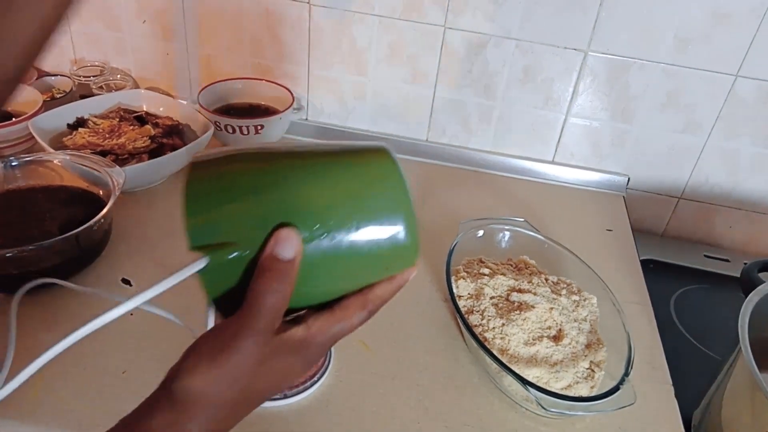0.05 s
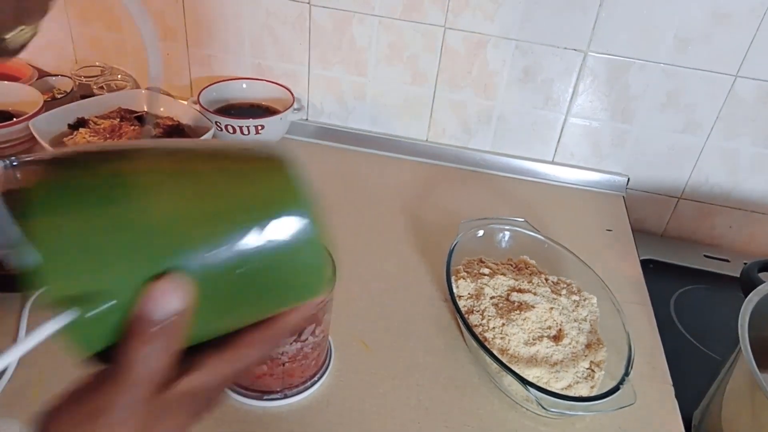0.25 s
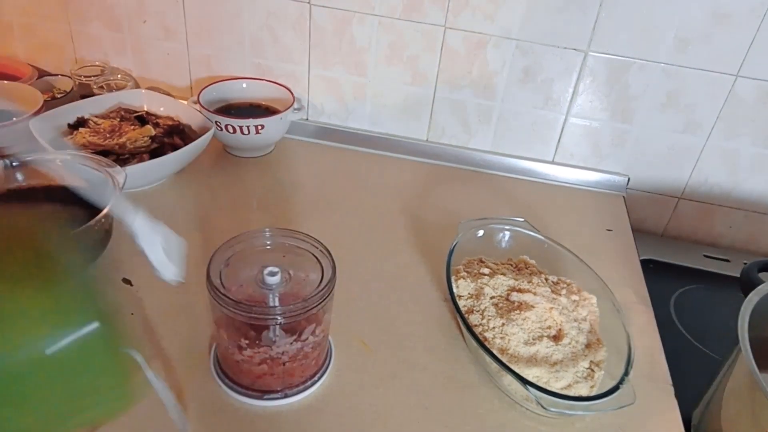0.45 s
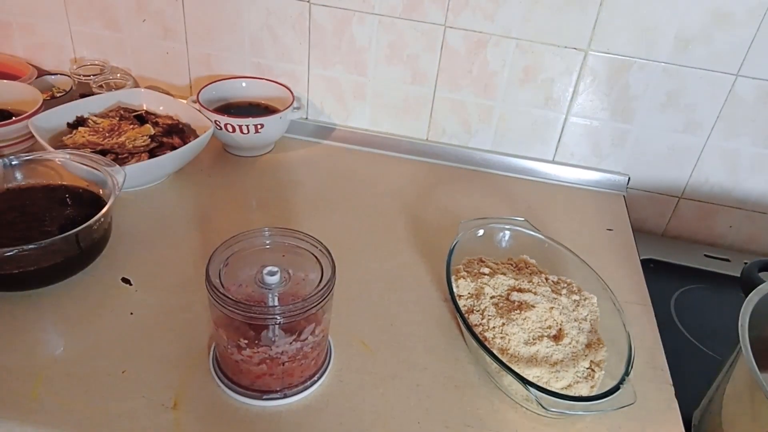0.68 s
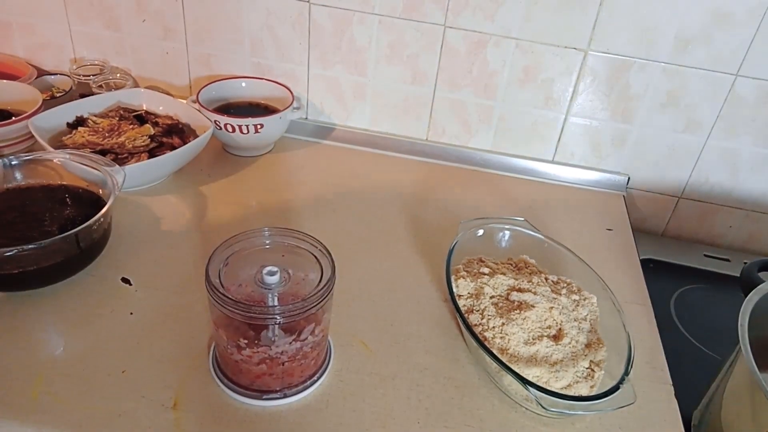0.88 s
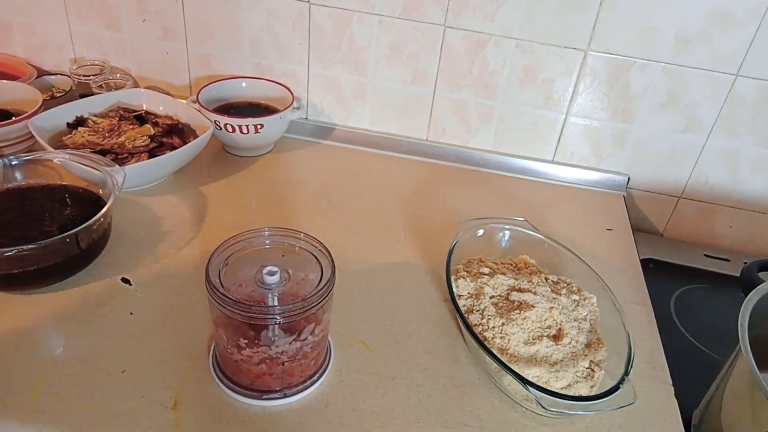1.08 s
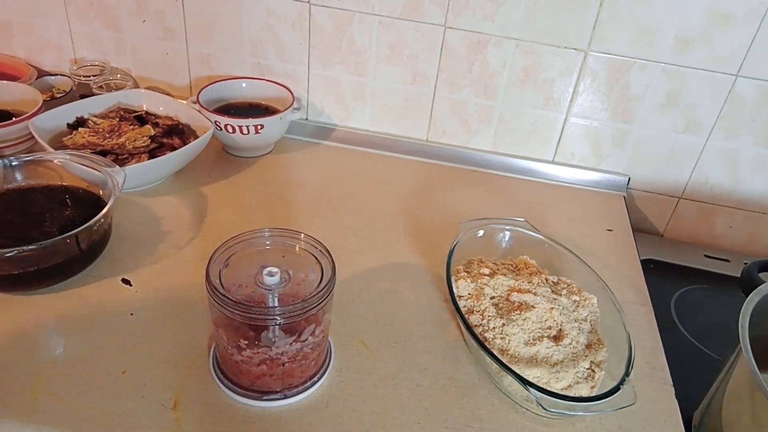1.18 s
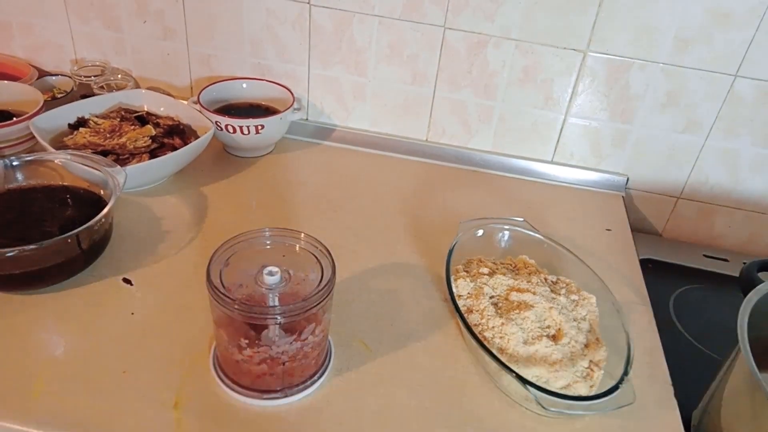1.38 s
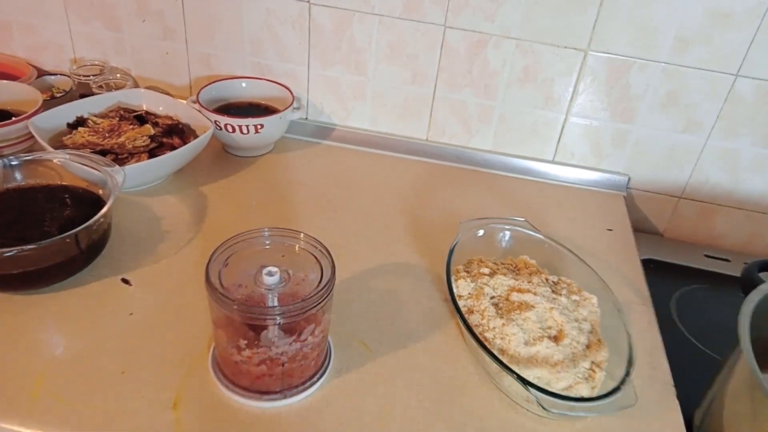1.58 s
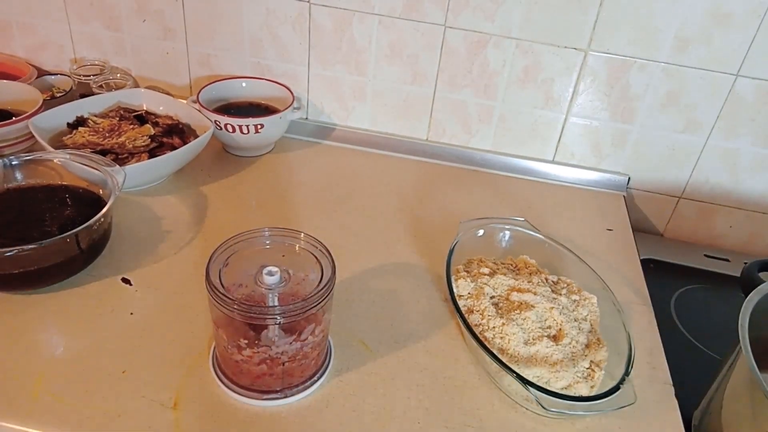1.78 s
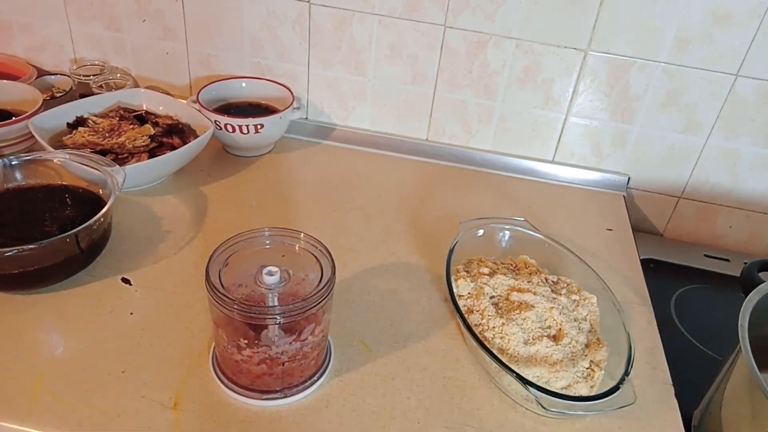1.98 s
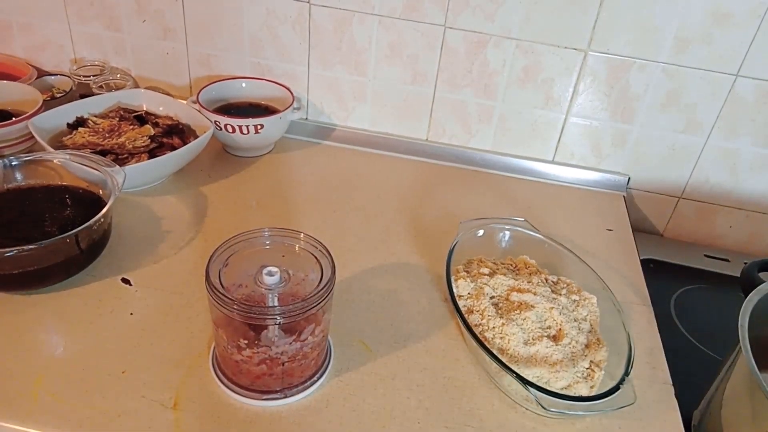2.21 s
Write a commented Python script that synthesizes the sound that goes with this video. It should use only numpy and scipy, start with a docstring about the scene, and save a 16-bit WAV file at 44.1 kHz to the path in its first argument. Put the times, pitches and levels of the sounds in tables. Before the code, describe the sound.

Plastic chopper pieces knock, click and scrape on a counter over a faint low appliance hum

```python
"""Parts of a small plastic food chopper are put down and shifted on a kitchen counter, away from the microphone.
An appliance hum (wavering tones in shaped noise) runs throughout, and a faint scrape (gritty noise) opens it.
Hollow knocks (short-lived tones of a housing) and hard clicks (noise bursts with a ringing lid) follow, mixed
with soft thumps (low fading tones), faint clinks of a cup and a glass dish (damped tones) and more scrapes.
All the handling rings in a tiled room, made of fading noise."""
import sys
import numpy as np
from scipy import signal
from scipy.fft import rfft, irfft, next_fast_len
from scipy.io import wavfile
from scipy.ndimage import uniform_filter1d, map_coordinates

SR = 44100
rng = np.random.default_rng(int(sys.argv[2]) if len(sys.argv) > 2 else 0)


def linear_from_db(decibels):
    """Turn decibels (scalar or array-like) into linear amplitude factors; 0 gives 1."""
    return 10 ** (np.asarray(decibels, float) / 20)


def master_out(mix):
    """Clip the mix to full scale and print it as 16-bit PCM to the path in sys.argv[1]."""
    frames = np.transpose(np.atleast_2d(mix))
    ceiling = np.clip(frames, -1, 1)
    pcm = np.round(ceiling * 32767).astype(np.int16)
    wavfile.write(sys.argv[1], SR, pcm)


N = 99225  # samples in the scene
EVENT_T = np.arange(SR // 3) / SR  # clock of one handling sound, s
WET_DB, KNOCK_WET_DB, NEAR_WET_DB = -6.5, -7.5, -8  # room level; least on clinks and thumps


def unit(x):
    """Scale to rms 1."""
    return x / np.sqrt(np.mean(x ** 2) + 1e-20)


def along(points, hz):
    """Read a curve of (Hz, value) points on a log frequency axis."""
    f, v = np.transpose(points)
    return np.interp(np.log(hz + 1), np.log(f + 1), v)


def coloured(x, gain):
    """Multiply the spectrum of x by a gain that depends on frequency."""
    m = next_fast_len(len(x) + 4096)
    return irfft(rfft(x, m) * gain(np.fft.rfftfreq(m, 1 / SR)), m)[:len(x)]


def add(out, s, x, wet_db=WET_DB):
    """Place a sound at s seconds with its room tail: noise that fades at its own rate in each band."""
    # How long the tiled room rings. Each row: frequency in Hz, time to fall 60 dB in seconds.
    room_times = [(200, 0.42), (600, 0.26), (2000, 0.46), (6000, 0.44), (9000, 0.29), (15000, 0.26)]
    predelay_s = 0.003
    hz, t, z = signal.stft(rng.standard_normal(SR // 2), SR, nperseg=256)
    fade = linear_from_db(-60 * t / along(room_times, hz)[:, None])
    tail = signal.istft(z * fade, SR, nperseg=256)[1]
    tail = np.pad(tail / np.linalg.norm(tail), (round(predelay_s * SR), 0))
    wet = linear_from_db(wet_db) * signal.fftconvolve(x, tail)
    wet[:len(x)] += x  # the direct sound
    i = round(s * SR)
    out[i:i + len(wet)] += wet


def plastic(x, tilt_db, low_hz):
    """Give x the colour of hard plastic, tilted about 4 kHz and cut below low_hz, at rms 1."""
    # The colour of hard plastic. Each row: frequency in Hz, relative level in dB per Hz.
    colour = [(300, 16.5), (1000, 3), (1700, 2.2), (2400, -1), (3800, 0.9), (7000, 0.25), (16500, -15.5)]

    def gain(hz):
        tilted_db = along(colour, hz) + tilt_db * np.log2((hz + 1) / 4000)
        return linear_from_db(tilted_db) / (1 + (low_hz / (hz + 1)) ** 6)

    return unit(coloured(x, gain))


def octaves(modes, hz):
    """Distance of each mode from a pitch, in octaves."""
    return np.log2(np.array(modes)[:, 0] / hz)


def ring(modes, gains_db, stretch, rise_s, flutter_db):
    """Sum damped tones, a little different at every blow; their levels flutter independently."""
    t, flutter_per_s = EVENT_T, 50
    hz, db, t60 = np.transpose(modes)[:, :, None]
    luck = rng.standard_normal((2, len(modes), 1))  # for level and starting phase
    knots = rng.standard_normal((len(modes), 40))
    flutter = 0
    if flutter_db:
        flutter = np.array([map_coordinates(k, [t * flutter_per_s], mode="wrap") for k in knots])
    fall_db = 60 * t / (stretch * np.maximum(t60, 0.005))
    level_db = db + gains_db[:, None] + 2.2 * luck[0] + flutter_db * flutter - fall_db
    tones = linear_from_db(level_db) * np.sin(2 * np.pi * hz * t + 0.77 * luck[1])
    return tones.sum(0) * (1 - np.exp(-t / rise_s))


def kitchen():
    """Room air is shaped noise; each hum tone is narrow noise, which wavers, plus a steady sine."""
    # Appliance hum. Each row: pitch in Hz, width of the waver in Hz, relative level in dB.
    hum_tones = [(101.6, 14, -59.5), (171.4, 78, -66), (329, 11, -70.5)]
    # The colour of the room air. Each row: frequency in Hz, relative level in dB per Hz.
    air_colour = [(15, -65), (43, -22), (80, -19), (177, 2), (252, -17.5), (400, -9), (669, -17.5),
                  (1030, -23), (1500, -19.5), (2670, -24), (5000, -28.5), (7300, -26), (10000, -32.5),
                  (16500, -37)]
    air_db = -60  # rms
    air = linear_from_db(air_db) * unit(coloured(rng.standard_normal(N), lambda f: linear_from_db(along(air_colour, f))))
    t = np.arange(N) / SR
    for hz, width_hz, db in hum_tones:
        narrow = coloured(rng.standard_normal(N), lambda f: 1 / (1 + ((f - hz) / width_hz) ** 2))
        steady = np.sin(2 * np.pi * hz * t)
        air = air + linear_from_db(db) * (0.5 * unit(narrow) + 0.37 * steady)
    return air


def scrapes(out):
    """Plastic dragged on the counter: scattered grains and smooth noise swell, hold and fade."""
    # Scrapes. Each row: start in seconds, rise in seconds, hold in seconds, relative level in dB,
    # tilt in dB per octave.
    strokes = [(0.0, 0.0016, 0.0038, -61.5, 5.5), (0.862, 0.004, 0.014, -55.5, -1),
               (1.02, 0.014, 0.086, -55, 7.5), (1.195, .008, 0.08, -55, 6),
               (1.371, 0.0034, 0.027, -58, 3.4), (1.444, 0.008, 0.055, -40.5, -2),
               (1.625, 0.009, 0.0098, -56, 4.5), (1.72, 0.0011, 0.1, -49.5, 8),
               (1.767, 0.0046, 0.07, -45, 1), (1.914, 0.0085, 0.031, -48, 1)]
    fall_s, grains_per_s, grain_spread_db = 0.037, 1500, 2
    t = EVENT_T
    for s, rise, hold, db, tilt_db in strokes:
        struck = rng.random(len(t)) < grains_per_s / SR
        sizes = linear_from_db(grain_spread_db * rng.standard_normal(len(t))) * rng.standard_normal(len(t))
        rub = unit(struck * sizes) + 1.2 * rng.standard_normal(len(t))
        stroke = np.clip(t / rise, 0, 1) * np.exp(-np.clip(t - rise - hold, 0, None) / fall_s)
        add(out, s, linear_from_db(db) * stroke * plastic(rub, tilt_db, 344))


def knocks(out):
    """A hollow housing rings in its own tones; the struck spot favours those near one pitch."""
    # Knocks. Each row: start in seconds, relative level in dB, favoured pitch in Hz,
    # fall-off away from it in dB per octave squared, ring length factor.
    blows = [(.2413, -12, 530, 20, 0.25), (.2435, -27, 390, 20, 2.5), (.254, -15, 540, 20, 0.4),
             (.245, -43, 1850, 250, 2.2), (.753, -40, 424, 164, 2.23), (.866, -34, 444, 53, 1.03),
             (.883, -42, 468, 98, 3.17), (1.438, -41, 800, 198, 2.9), (1.450, -35, 790, 60, 1),
             (1.460, -27.5, 454, 29, 0.44), (1.473, -28, 560, 12, 0.6), (1.492, -34, 350, 40, 1),
             (1.524, -40, 780, 60, 2), (1.765, -32.5, 312, 72, 1.5), (1.796, -31.5, 395, 8.5, 0.67),
             (1.822, -35.5, 353, 9, 1.32), (1.863, -37, 317, 42, 2.1), (1.917, -27, 320, 61, .9),
             (1.935, -41, 750, 61, 0.91), (1.946, -33, 354, 11, 0.95), (1.967, -30, 320, 59, 1),
             (2.011, -40, 300, 70, 1.54), (2.043, -36.5, 310, 101, 1.17)]
    # Tones of the housing. Each row: pitch in Hz, relative level in dB,
    # time to fall 60 dB in seconds before the ring length factor.
    housing = [(312, -4, 0.081), (355.5, -7, 0.11), (422, -13, 0.08), (456.8, -6.5, 0.12),
               (479, -4.5, 0.061), (527.4, -2.9, 0.087), (589.5, 7, 0.02), (721.5, -2.5, 0.067),
               (781, 6, 0.035), (882, 2.5, 0.057), (1110, 11.5, 0.016), (1307, -6, 0.11), (1640, 30, 0.012),
               (1798, 1, 0.12)]
    for s, db, hz, fall_db, stretch in blows:
        gains_db = -fall_db * octaves(housing, hz) ** 2
        knock = ring(housing, gains_db, stretch, rise_s=0.0035, flutter_db=3)
        add(out, s, linear_from_db(db) * knock, KNOCK_WET_DB)


def clicks(out):
    """Hard plastic meets with a snap and a fading rattle of noise, while a lid rings beneath."""
    # Clicks. Each row: start in seconds, relative level in dB, tilt in dB per octave,
    # lowest pitch in Hz, time for the rattle to fall 60 dB in seconds.
    contacts = [(0.2421, -20, 1, 830, 0.066), (0.2547, -20, -2, 880, 0.027), (0.6075, -22.5, 0, 2685, .018),
                (0.8125, -27.5, 3.5, 3900, 0.0024), (1.194, -39, 10, 2140, 0.18),
                (1.3442, -44, -2, 3220, 0.2), (1.3549, -46, -17, 3300, 0.042), (1.467, -37, 4, 3350, 0.08),
                (1.4747, -34, -17, 1500, 0.018), (1.7218, -40, 8, 7500, .005),
                (1.767, -37.5, 6.5, 2780, 0.048), (1.918, -40, -5, 1800, 0.0093)]
    # Tones of the lid. Each row: pitch in Hz, relative level in dB, time to fall 60 dB in seconds.
    lid = [(1340, -24, 0.4), (2200, -26, 0.35), (3690, -1, 0.03), (6050, -6, 0.03), (6800, -3, 0.05)]
    lid_db = -13
    t = EVENT_T
    snap = 9 * (np.arange(len(t)) == SR // 1500)  # first contact, in multiples of the raw rattle
    for s, db, tilt_db, low_hz, t60 in contacts:
        rattle = plastic(rng.standard_normal(len(t)) + snap, tilt_db, low_hz)
        crack = linear_from_db(-60 * t / t60) * rattle * (1 - np.exp(-t / 0.0011))
        # The lid follows the click's tilt, but never darker than -1 dB per octave.
        gains_db = max(tilt_db, -1) * octaves(lid, 8000)
        lid_ring = ring(lid, gains_db, 1, rise_s=0.000053, flutter_db=-6.5)
        add(out, s, linear_from_db(db) * (crack + linear_from_db(lid_db) * lid_ring))


def thumps(out):
    """Soft heavy contacts shake the counter: low sines that swell and die away."""
    # Thumps. Each row: start in seconds, level in dB before the swell and fade, pitch in Hz.
    shakes = [(0.774, -46, 173), (1.45, -68, 160), (1.784, -37, 103.7)]
    t60, rise_s = 0.16, 0.009  # seconds
    t = EVENT_T
    for s, db, hz in shakes:
        shake = linear_from_db(db - 60 * t / t60) * np.sin(2 * np.pi * hz * t)
        add(out, s, shake * (1 - np.exp(-t / rise_s)), NEAR_WET_DB)


def clink(out, modes, touches):
    """A touched dish rings most near a favoured pitch, and its tones beat unevenly."""
    for s, db, hz, fall_db, stretch in touches:
        gains_db = -fall_db * octaves(modes, hz) ** 2
        dish_ring = ring(modes, gains_db, stretch, rise_s=0.0012, flutter_db=4.5)
        add(out, s, linear_from_db(db) * dish_ring, NEAR_WET_DB)


def cup_clinks(out):
    """A smaller dish rings in its own damped tones."""
    # Tones of the cup. Each row: pitch in Hz, relative level in dB,
    # time to fall 60 dB in seconds before the ring length factor.
    cup = [(3190, -4, 0.3), (3340, -1, 0.3), (4355, -9, 0.2), (5430, -11, .2), (6900, -14.5, 0.12),
           (7140, -14, .1), (7650, 0, 0.2), (7900, 13, 0.03), (9960, -2, 0.05)]
    # Clinks. Each row: start in seconds, relative level in dB, favoured pitch in Hz,
    # fall-off away from it in dB per octave squared, ring length factor.
    cup_touches = [(0.808, -45, 6650, 14, 0.39), (1.721, -44, 5000, 0.27, 0.45)]
    clink(out, cup, cup_touches)


def glass_clinks(out):
    """A glass dish rings in its own damped tones."""
    # Tones of the glass dish. Each row: pitch in Hz, relative level in dB,
    # time to fall 60 dB in seconds before the ring length factor.
    glass = [(1637, -9, .12), (2280, -7, .3), (3040, -2, .55), (3865, -7, .3), (4775, -6, .25),
             (5760, 1, .45), (6880, 0, .4), (7617, -8, .3), (8064, -2, .7), (9350, 0, .4), (10270, -2, .15),
             (10700, -4, .7), (11700, -8, .3), (15350, -11, .2)]
    # Clinks. Each row: start in seconds, relative level in dB, favoured pitch in Hz,
    # fall-off away from it in dB per octave squared, ring length factor.
    glass_touches = [(1.055, -52, 10500, 150, 0.12), (1.6, -65, 5700, 188, .8),
                     (1.641, -43, 10700, 150, .04), (1.192, -50, 6000, 0, 0.8), (1.201, -50, 5070, 0, 0.5)]
    clink(out, glass, glass_touches)


def handling():
    """Small parts radiate little bass, so only the thumps of the counter keep theirs."""
    parts, counter = np.zeros(N + 2 * SR), np.zeros(N + 2 * SR)
    scrapes(parts)
    knocks(parts)
    clicks(parts)
    thumps(counter)
    cup_clinks(parts)
    glass_clinks(parts)
    body_low_hz = 225
    return coloured(parts[:N], lambda f: 1 / (1 + (body_low_hz / (f + 1)) ** 8)) + counter[:N]


def scene():
    """The handling over the kitchen's background sound."""
    return (kitchen() + handling())[None]


def roll_off(x):
    """The treble ends steeply here."""
    return signal.sosfilt(signal.butter(12, 17030, fs=SR, output="sos"), x)


def record(dry):
    """Microphone colour, a noise suppressor that lowers near-quietest treble, and brief treble dips."""
    # The colour of the microphone. Each row: frequency in Hz, gain in dB.
    mic_colour = [(60, 6.5), (7600, 2.5), (8600, -7.5), (10500, 1), (11600, -6.5), (13200, -12.5),
                  (14500, -4), (15500, 6.5), (16500, -37)]
    # Brief dips of the treble. Each row: centre in seconds, depth in dB.
    dips = [(0.096, 7.5), (0.818, 11.5), (1.011, 9), (1.08, 16), (1.289, 6.5)]
    dip_s, treble_hz = 0.006, 830  # width of a dip; where the treble begins
    over_quiet_db, most_cut_db, knee_db = 9, 4.5, 7.5  # suppressor threshold, depth and softness
    heard = coloured(dry[0], lambda f: linear_from_db(along(mic_colour, f)))
    hz, t, z = signal.stft(heard, SR, nperseg=512)
    # Smooth the power over neighbouring bands, then over time.
    power = uniform_filter1d(np.abs(z) ** 2, size=19, axis=0)
    power = uniform_filter1d(power, size=5, axis=1)
    level_db = 10 * np.log10(np.abs(power) + 1e-16)
    quiet_db = np.percentile(level_db, 20, axis=1, keepdims=True)
    over_db = level_db - quiet_db - over_quiet_db
    cut_db = most_cut_db * (0.5 - 0.5 * np.tanh(over_db / knee_db))
    dip_db = sum(db * np.exp(-0.5 * ((t - s) / dip_s) ** 2) for s, db in dips)
    treble = 1 / (1 + (treble_hz / (hz + 1)) ** 4)  # both act mainly on the treble
    gain = linear_from_db(-treble[:, None] * (cut_db + dip_db))
    x = signal.istft(z * gain, SR, nperseg=512)[1][:N]
    mix = coloured(x, lambda f: f < 16000)[None]  # nothing passes above 16 kHz
    return roll_off(mix)


dry = scene()
out = record(dry)
master_out(out)
```